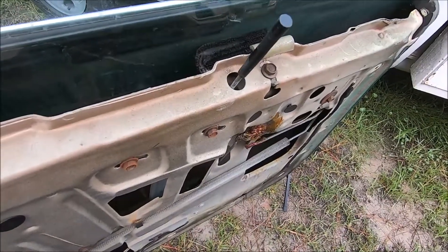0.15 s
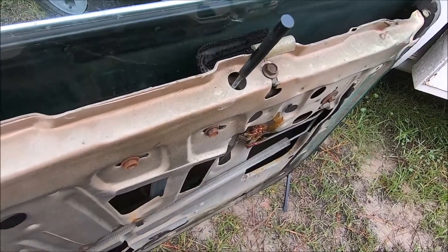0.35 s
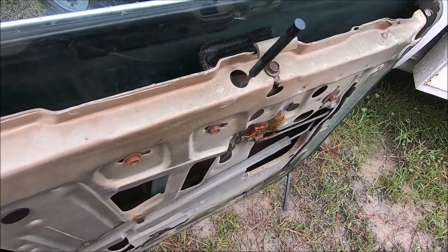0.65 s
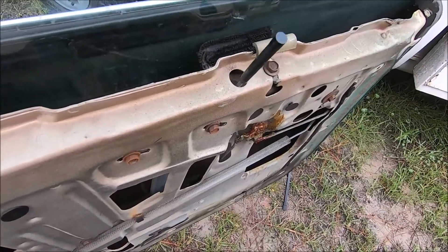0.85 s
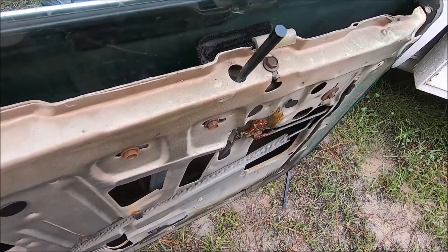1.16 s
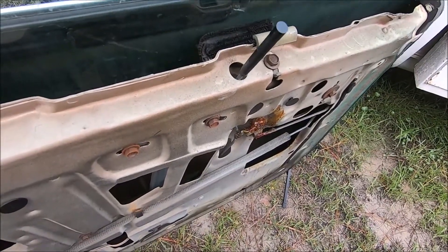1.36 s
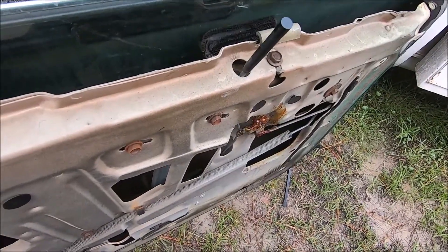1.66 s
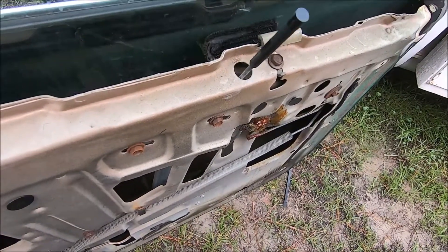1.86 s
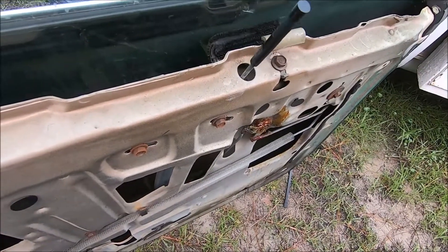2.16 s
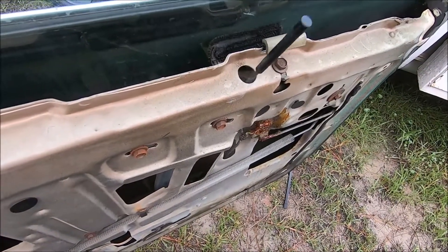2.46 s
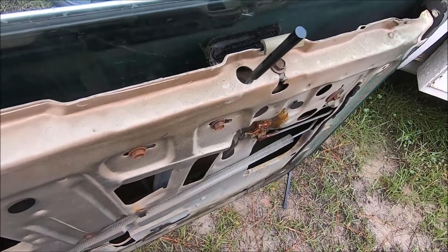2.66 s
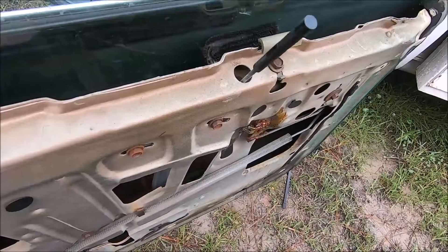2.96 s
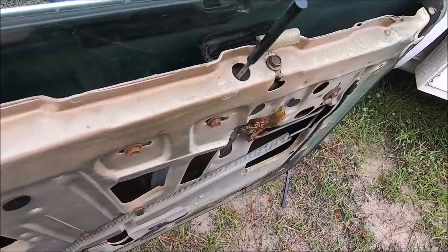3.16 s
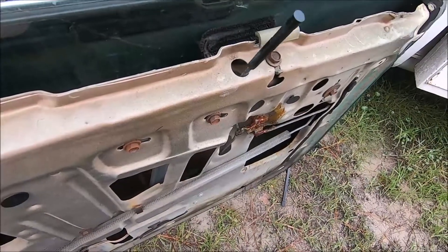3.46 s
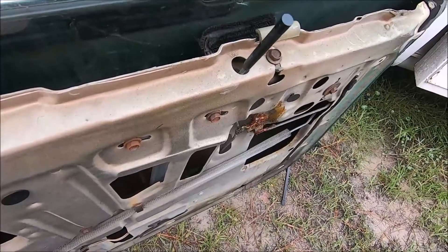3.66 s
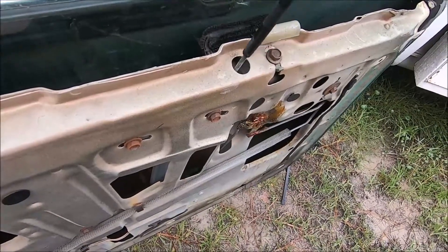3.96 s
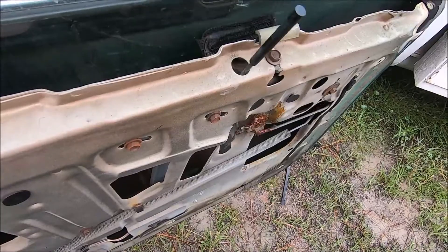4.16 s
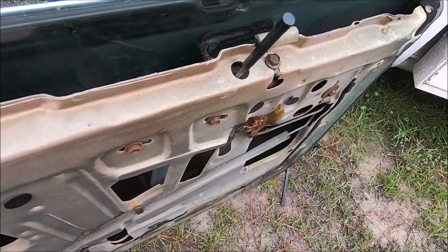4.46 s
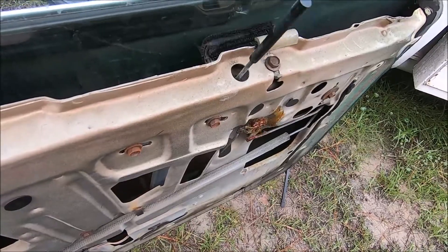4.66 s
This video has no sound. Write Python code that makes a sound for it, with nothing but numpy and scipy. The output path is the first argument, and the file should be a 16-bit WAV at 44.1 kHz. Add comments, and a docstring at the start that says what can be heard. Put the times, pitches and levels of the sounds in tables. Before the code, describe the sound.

Close to a stripped car door in quiet outdoor air, the tail of an earlier clunk fades. A switch clicks, then the lock motor whirrs briefly and throws the latch with a booming metallic clunk and rattle. After a pause with a plastic clack and dry tick, seven more clunks follow in a quickening run, locking and unlocking alternately, each settling with soft bounces.

```python
"""Over still outdoor air and a throbbing hum, the end of an earlier stroke fades in a stripped car door.
A rocker switch clicks, then a power lock makes eight strokes, locking and unlocking in turn, with a click
before each locking one. Gear teeth whirr, the linkage takes up its slack, throws the latch and hits its stop.
The sheet metal booms, the latch pings or a small spring sings, the rod rattles and the linkage settles.
A plastic clack, a dry tick and a scuff fall after the first stroke. Bodies are decaying noise and sine modes."""
import sys
import numpy as np
from scipy import signal
from scipy.io import wavfile

SR = 44100
rng = np.random.default_rng(int(sys.argv[2]) if len(sys.argv) > 2 else 0)


def persist_wave(psi):
    """Save psi, clipped to +-1, as 16-bit WAV."""
    counts = np.round(np.clip(psi, -1, 1) * 32767).astype(np.int16)
    wavfile.write(sys.argv[1], SR, np.atleast_2d(counts).T)


N = 212120
RING_SIZE = 3 * SR // 4   # samples kept of every ring


def from_db(db):
    """Decibels to gain."""
    return 10 ** (np.asarray(db) / 20)


def rms(x):
    """Root mean square."""
    return np.sqrt(np.mean(x ** 2) + 1e-20)


def unit(sound):
    """Scale a stereo ring so that its first 25 ms have rms 1."""
    return sound / rms(sound[:, :SR // 40])


def at_hz(points, hz):
    """Read a table on a log-frequency axis."""
    table = np.array(points)
    return np.interp(np.log(hz), np.log(table[:, 0]), table[:, 1])


def band(x, edges_hz, kind, order=2):
    """Butterworth filter."""
    return signal.sosfilt(signal.butter(order, edges_hz, kind, fs=SR, output="sos"), x)


def add(out, s, sound):
    """Mix a sound in at a time."""
    start = int(np.clip(round(s * SR), 0, N - 1))
    out[..., start:start + sound.shape[-1]] += sound[..., :N - start]


# stereo width of all noise: pitch_hz, side_minus_mid_db
WIDTH = [(60, -19), (270, -19), (500, -9), (1000, -3.5), (2000, -1), (4000, -3), (12000, -1)]
# its left-right balance: pitch_hz, left_minus_right_db
BALANCE = [(60, 1.5), (270, -0.5), (500, 5.5), (1000, 1.3), (2000, 2), (4000, -0.3), (12000, -1)]


def noise_bands(spectrum, size):
    """Split stereo noise into narrow bands, as (centre Hz, sound of rms 1, gain of each channel)."""
    edges = np.geomspace(22, 17000, 30)
    white = rng.standard_normal((2, 2, size + SR // 4))   # the extra quarter second lets the filters settle
    for k, (low, high) in enumerate(zip(edges, edges[1:])):
        hz = np.sqrt(low * high)
        mid, side = band(white[k % 2], [low, high], "band")[:, -size:]
        pair = mid + from_db(at_hz(WIDTH, hz)) * side * np.array([[1], [-1]])
        pan = from_db(at_hz(BALANCE, hz) * np.array([[.5], [-.5]]))
        yield hz, pair / rms(pair), pan * from_db(at_hz(spectrum, hz)) * np.sqrt(high - low)


# relative colour of still outdoor air: pitch_hz, density_db_per_hz
AIR_COLOUR = [(25, -9), (50, 2), (80, 6), (125, -8), (250, -9), (400, -18.5), (630, -29.5), (1000, -31),
              (2000, -39), (4000, -52.5), (7000, -53), (10000, -48.5), (15000, -63)]
# steady hum tones: pitch_hz, level_db_rms
HUM = [(59.3, -45.5), (68, -62)]
AIR_DB = -45.5   # rms


def outdoors():
    """Quiet air is coloured noise; the low hum throbs because its two tones beat."""
    air = sum(noise * gain for _, noise, gain in noise_bands(AIR_COLOUR, N))
    t = np.arange(N) / SR
    hum = sum(from_db(db) * np.sqrt(2) * np.sin(2 * np.pi * hz * t) for hz, db in HUM)
    return from_db(AIR_DB) * air / rms(air) + hum


def dense_modes(spectrum, t60s, build_cycles):
    """Response of countless close modes to one touch, as decaying noise; the lows build up later."""
    t, out = np.arange(RING_SIZE) / SR, 0
    for hz, noise, gain in noise_bands(spectrum, RING_SIZE):
        decay = np.exp(-np.log(1000) * t / at_hz(t60s, hz))
        shape = decay * (1 - np.exp(-t * hz / build_cycles))
        ring = noise * shape
        out = out + ring * (gain * rms(shape) / rms(ring))
    return out


def resonate(x, resonances):
    """Lift the broad resonances of a body."""
    for hz, width, db in resonances:
        x = x + (from_db(db) - 1) * signal.lfilter(*signal.iirpeak(hz, hz / width, fs=SR), x)
    return x


def registers(response):
    """Split a response into thump, clank and tick, each starting at rms 1."""
    thump_top_hz, tick_bottom_hz = 592, 3300
    thump = band(response, thump_top_hz, "low", order=4)
    clank = band(response, [thump_top_hz, tick_bottom_hz], "band", order=4)
    tick = band(response, tick_bottom_hz, "high", order=4)
    return [unit(thump), unit(clank), unit(tick)]


def contact_points(spectrum, resonances, t60s, build_cycles, count):
    """One response for each place where a body is touched: (place, register, channel, time)."""
    places = []
    for _ in range(count):
        response = dense_modes(spectrum, t60s, build_cycles)
        places.append(registers(resonate(response, resonances)))
    return np.array(places)


def touch(places):
    """Each contact lands somewhere else and so wakes its own blend of modes."""
    blend = rng.standard_normal(len(places))
    return np.tensordot(blend / np.linalg.norm(blend), places, 1)


# relative colour of the door's dense modes: pitch_hz, density_db_per_hz
DOOR_COLOUR = [(30, -15.5), (45, 0.5), (70, 3.5), (130, 0), (270, 1), (450, -7), (700, -18), (1700, -16.5),
               (2600, -24), (4200, -21.5), (6200, -27), (7500, -27.5), (10000, -28), (15000, -55)]
# their ring time: pitch_hz, t60_s
DOOR_T60 = [(40, 0.78), (130, 0.51), (300, 0.32), (600, 0.29), (1300, 0.17), (2600, 0.081), (5000, 0.086),
            (9000, 0.043), (15000, 0.14)]
# broad resonances of the door cavity and rod: centre_hz, width_hz, lift_db
DOOR_RESONANCES = [(261.6, 51, 6), (1003, 100, 4), (1370, 120, 3), (1795, 120, 7), (2245, 110, 6),
                   (2860, 260, 3), (3860, 120, 4), (6200, 400, 6.5)]


def door_body():
    """The sheet-metal door, ringing from five contact points."""
    return contact_points(DOOR_COLOUR, DOOR_RESONANCES, DOOR_T60, build_cycles=0.41, count=5)


def ringing(modes):
    """Responses of a few clear modes to one touch, one row each, with alternating sign."""
    t = np.arange(RING_SIZE) / SR
    rows = []
    for k, (hz, db, t60) in enumerate(modes):
        rows.append((-1) ** k * from_db(db - 60 * t / t60) * np.sin(2 * np.pi * hz * t))
    return np.array(rows)


def skin(rings, spread_db):
    """The outer panel's clear modes, with new strengths at every blow, slightly to the left."""
    strengths = from_db(spread_db * rng.standard_normal(len(rings)))
    return strengths @ rings * from_db([[.6], [-.6]])


def chatter(decay_s, per_s, spread_db, close_s):
    """A first contact, then random uneven ones that swell and die away, with unit energy."""
    t = np.arange(SR // 3) / SR
    hits = (rng.random(len(t)) < per_s / SR) * rng.choice([-1, 1], len(t))
    contacts = hits * from_db(spread_db * rng.standard_normal(len(t)))
    force = contacts * np.exp(-t / max(decay_s, 1e-4)) * (1 - np.exp(-t / close_s))
    force[0] = .3
    return force / np.linalg.norm(force)


def drive(response, force):
    """Play a force through a stereo response."""
    return signal.fftconvolve(response, force[None], axes=1)[:, :response.shape[1]]


# clear modes of the outer door panel: pitch_hz, level_db, t60_s
SKIN_MODES = [(65.9, -9.5, 0.49), (103.3, -11.5, 0.3), (136.2, -12.5, 0.65), (161.5, -10.5, 0.25),
              (220.4, -11, 0.48), (247, -13, 0.19), (261.7, -4.5, 0.25), (273.5, -0.5, 0.25),
              (293, -4.5, 0.21), (340, -21, 0.33), (449, -7, 0.31), (500.5, -12.5, 0.19),
              (551, -16.5, 0.35), (566, -16.5, 0.26), (671, -22, 0.19), (784, -27, 0.78),
              (959, -21.5, 0.47), (1031, -20.5, .35)]


def blows(rows, places, skin_db, contacts_per_s, close_s):
    """The bass feels each blow as one push; higher up it breaks into a burst of small contacts."""
    out, rings = np.zeros((2, N)), ringing(SKIN_MODES)
    for s, clank_db, thump_db, tick_db, chatter_s in rows:
        thump, clank, tick = touch(places)
        force = chatter(chatter_s, contacts_per_s, spread_db=3.0, close_s=close_s)[:SR // 10]
        boom = thump + from_db(skin_db) * skin(rings, spread_db=3.5)
        add(out, s, from_db(thump_db) * unit(boom))
        add(out, s, from_db(clank_db) * unit(drive(clank[:, :SR // 2], force)))
        add(out, s, from_db(tick_db) * unit(drive(tick[:, :SR // 4], force)))
    return out


def repeated(events, pattern):
    """The same short run of blows at every event (start_s, level_db)."""
    return [(s + delay, clank + db, thump + db, tick + db, chatter_s)
            for s, db in events for delay, clank, thump, tick, chatter_s in pattern]


def struck(rows, modes):
    """A small part rings with the same modes at every touch (start_s, level_db)."""
    out, ring = np.zeros(N), ringing(modes).sum(axis=0)
    for s, db in rows:
        add(out, s, from_db(db) * ring)
    return out


def soft_blows(rows, door):
    """Gentle blows on the door, with less of the panel's clear modes and a slower swell of contacts."""
    return blows(rows, door, skin_db=0.5, contacts_per_s=900, close_s=0.0016)


# fading end of an earlier stroke: start_s, clank_db, thump_db, tick_db, chatter_s
STROKE_TAIL = [(.001, -39, -31.5, -52, 0.0075)]


def stroke_tail(door):
    """An earlier stroke fades as the door's modes ring down."""
    return soft_blows(STROKE_TAIL, door)


# clear modes of the small spring: pitch_hz, level_db, t60_s
SPRING_MODES = [(5593, 0, .36), (5583, -10, .3), (5552, -15, .25)]


def spring():
    """Unlocking and its second settling bounce pluck it; it sings faintly in the stroke tail and at clicks."""
    second_bounce_s = UNLOCK_BOUNCES[1][0]
    faint_db = -54.5
    stops = [(stop, db) for stop, *_, db in UNLOCKS]
    again = [(s + second_bounce_s, db) for (s, *_), (_, db) in zip(UNLOCK_SETTLES, stops)]
    faint = [(s, faint_db) for s, *_ in CLICKS + STROKE_TAIL]
    return struck(stops + again + faint, SPRING_MODES)


# relative colour of the rocker's dense modes: pitch_hz, density_db_per_hz
ROCKER_COLOUR = [(60, -4.5), (210, -0.5), (400, -7), (700, -8.5), (1200, -3), (1800, -2), (2600, -7),
                 (4000, -10), (6500, -20), (10000, -26.5), (15000, -42)]
# their ring time: pitch_hz, t60_s
ROCKER_T60 = [(60, 0.34), (220, 0.58), (500, 0.32), (1200, 0.25), (3000, 0.057), (7000, 0.081),
              (15000, 0.045)]
# broad resonances of the switch plate: centre_hz, width_hz, lift_db
ROCKER_RESONANCES = [(455, 90, 8), (1100, 270, 8), (2012, 43, 8), (2300, 75, 3), (3170, 200, 3),
                     (3830, 150, 1.5), (4250, 150, 4.5)]
# rocker switch clicks: start_s, level_db
CLICKS = [(.121, 0.5), (2.299, 0), (3.323, -3), (4.119, -2)]
# the rocker slides, then snaps over: delay_s, clank_db, thump_db, tick_db, chatter_s
ROCKER_SNAP = [(-.014, -47.5, -46, -70, 0.03), (0, -31.5, -38, -35, 0.0067)]
# light taps on the rocker: start_s, clank_db, thump_db, tick_db, chatter_s
ROCKER_TAPS = [(.169, -59, -43.5, -43, 0.0016), (.362, -44.5, -48.5, -52, 0.004),
               (.984, -39, -36.5, -48, 0.0021)]
# the rocker springs back: start_s, level_db
RELEASES = [(.363, -30)]
# clear modes of its housing: pitch_hz, level_db, t60_s
HOUSING_MODES = [(215.3, -1, 0.69), (1172, -2.5, 0.13), (1465, -1, 0.053), (1730, -11, 0.12),
                 (9040, -15.5, 0.048), (12200, -30, .06)]


def switch():
    """The rocker slides, snaps and is tapped on its plate; its housing rings as it springs back."""
    rocker = contact_points(ROCKER_COLOUR, ROCKER_RESONANCES, ROCKER_T60, build_cycles=1.5, count=3)
    rows = repeated(CLICKS, ROCKER_SNAP) + ROCKER_TAPS
    clicks = blows(rows, rocker, skin_db=-10, contacts_per_s=1200, close_s=.0015)
    return clicks + struck(RELEASES, HOUSING_MODES)


# soft knock in the door after each click: delay_s, clank_db, thump_db, tick_db, chatter_s
AFTER_KNOCK = [(0.094, -44, -41, -71.5, 0.005)]


def after_knocks(door):
    """The door knocks softly after each click."""
    return soft_blows(repeated(CLICKS, AFTER_KNOCK), door)


# locking strokes: stop_s, travel_s, level_db, extra_thump_db, rattle_db, rattle_decay_s, latch_ping_db
LOCKS = [(.72, .042, .5, -0.5, -23.5, 0.062, -33), (2.595, .044, .5, -0.5, -22, 0.05, -21),
         (3.495, .037, 0, -2, -22, .04, -22), (4.2775, .04, 0, -2.5, -24, 0.055, -14)]
# unlocking strokes: stop_s, travel_s, level_db, extra_thump_db, rattle_db, rattle_decay_s, spring_db
UNLOCKS = [(1.981, .043, 1, 1, -42.5, 0.14, -46.5), (3.063, .04, -0.5, -.5, -37.5, 0.078, -53.5),
           (3.878, 0.038, 0.16, -1.5, -26, 0.047, -57.5), (4.63, .042, -1.34, 0.5, -40.5, 0.051, -54)]
# motor run ahead of the first blow of a stroke: lead_s, length_s, level_db
LOCK_RUN = (.021, .075, -32.5)
UNLOCK_RUN = (.015, 0.053, -32)


def motor_runs(strokes, run):
    """One run of the motor for each stroke: (start_s, length_s, level_db)."""
    lead, length, run_db = run
    return [(stop - travel - lead, length, run_db + db) for stop, travel, db, *_ in strokes]


def motor(door):
    """Gear teeth mesh faster and harder, with uneven force, as the motor spins up for a brief run."""
    top_tooth_hz, spin_up_s, rough, tick_db = 2277, .007, 2.2, -6.5
    out = np.zeros((2, N))
    for s, length, db in motor_runs(LOCKS, LOCK_RUN) + motor_runs(UNLOCKS, UNLOCK_RUN):
        _, clank, tick = touch(door)
        t = np.arange(int(length * SR)) / SR
        speed = 1 - np.exp(-t / spin_up_s)
        meshes = np.diff(np.floor(np.cumsum(top_tooth_hz * speed) / SR), prepend=0)
        teeth = meshes * speed * (1 + rough * rng.standard_normal(len(speed)))
        sound = drive(clank + from_db(tick_db) * tick, teeth)
        add(out, s, from_db(db) * sound / rms(sound[:, :len(speed)]))
    return out


# slack, latch and stop: share_of_travel_to_go, clank_db, thump_db, tick_db, chatter_s
LOCK_BLOWS = [(1, -25, -20.5, -36, .0042), (.76, -22, -18.5, -25.5, 0.0039),
              (0.0021, -23, -15.5, -28, .0034)]
UNLOCK_BLOWS = [(1, -29, -34.5, -34, .012), (.57, -29, -20, -46.5, 0.0036),
                (0, -21.5, -19.5, -26.5, 0.0059)]


def stroke_blows(strokes, pattern):
    """The three blows of each stroke, spread over its travel."""
    return [(stop - to_go * travel, clank + db, thump + db + extra_db, tick + db, chatter_s)
            for stop, travel, db, extra_db, *_ in strokes
            for to_go, clank, thump, tick, chatter_s in pattern]


def lock_strokes(door):
    """The linkage takes up its slack, throws the latch and hits its stop, shaking the door."""
    rows = stroke_blows(LOCKS, LOCK_BLOWS) + stroke_blows(UNLOCKS, UNLOCK_BLOWS)
    return blows(rows, door, skin_db=2.0, contacts_per_s=1100, close_s=0.0012)


# clear modes of the latch: pitch_hz, level_db, t60_s
LATCH_MODES = [(5860, 5, 0.017), (6370, -1, .06), (6560, -0.5, 0.017), (8800, -14.5, 0.066)]


def latch_pings():
    """The latch pings at the end stop of each locking stroke."""
    return struck([(stop, db) for stop, *_, db in LOCKS], LATCH_MODES)


def rod(door):
    """The loose rod buzzes just after each end stop; its treble fades faster, so the rattle dulls."""
    delay_s, soften_s = .015, .14
    thump_db, tick_db = 3.5, -9   # against the clank
    out = np.zeros((2, N))
    for stop, *_, db, decay_s, _ in LOCKS + UNLOCKS:
        thump, clank, tick = touch(door)
        force = chatter(decay_s, per_s=300, spread_db=2.5, close_s=0.001)
        hard = force * np.exp(-np.arange(len(force)) / SR / soften_s)
        body = drive(clank + from_db(thump_db) * thump, force)
        sound = body + from_db(tick_db) * drive(tick, hard)
        add(out, stop + delay_s, from_db(db) * sound / rms(sound[:, :SR // 20]))
    return out


# the linkage settles back: start_s, level_db, extra_loss_per_bounce_db
LOCK_SETTLES = [(.849, 0, 3.5), (2.711, -3.5, -2), (3.621, 1, 13), (4.384, 0, 2.5)]
UNLOCK_SETTLES = [(2.116, 2.5, 0.62), (3.148, -2, 0.8), (3.932, -3, 2.7), (4.708, -1, 0)]
# its three bounces: delay_s, clank_db, thump_db, tick_db, chatter_s
LOCK_BOUNCES = [(0, -36, -37.5, -50, 0.0088), (.036, -38, -34.5, -53, 0.011), (0.089, -47, -42, -66, .004)]
UNLOCK_BOUNCES = [(0, -37, -31, -56, 0.011), (.024, -38.5, -33, -47, 0.0057), (.078, -48, -38, -62.5, .009)]


def bounces(settles, pattern):
    """Each settling is the same few bounces, dying faster when more is lost on each."""
    rows = []
    for s, db, loss_db in settles:
        for k, bounce in enumerate(pattern):
            rows += repeated([(s, db - k * loss_db)], [bounce])
    return rows


def settling(door):
    """The linkage settles back after each stroke in three soft bounces."""
    rows = bounces(LOCK_SETTLES, LOCK_BOUNCES) + bounces(UNLOCK_SETTLES, UNLOCK_BOUNCES)
    return soft_blows(rows, door)


# plastic clacks: start_s, level_db
CLACKS = [(.985, -31)]
# clear modes of the plastic part: pitch_hz, level_db, t60_s
CLACK_MODES = [(1550, -2.5, 0.1), (1670, 3, 0.062), (1830, -8, 0.076), (2250, -18, 0.066),
               (2650, -11, 0.065)]


def clack():
    """A plastic part clacks with a few short modes."""
    return struck(CLACKS, CLACK_MODES)


# a dry tick, then a faint scuff: start_s, clank_db, thump_db, tick_db, chatter_s
DRY_TICKS = [(1.191, -45.5, -38, -48, 0.0028), (1.312, -73, -63, -64.5, 0.027)]
# relative colour of the dry part: pitch_hz, density_db_per_hz
DRY_COLOUR = [(60, -16), (250, 3), (700, -5), (1600, -4), (4000, -16.5), (10000, -13), (15000, -24)]
# its ring time: pitch_hz, t60_s
DRY_T60 = [(100, 0.14), (1000, 0.069), (5000, 0.077), (15000, 0.088)]


def dry_ticks():
    """A short-ringing part nearby ticks once, then scuffs in a longer run of contacts."""
    part = contact_points(DRY_COLOUR, [], DRY_T60, build_cycles=0.67, count=1)
    return blows(DRY_TICKS, part, skin_db=-24.5, contacts_per_s=1300, close_s=0.0012)


def scene():
    """The lock sounds through the door; the switch and small ticks have bodies of their own."""
    door = door_body()
    before = outdoors() + stroke_tail(door) + spring() + switch() + after_knocks(door)
    strokes = motor(door) + lock_strokes(door) + latch_pings() + rod(door) + settling(door)
    return before + strokes + clack() + dry_ticks()


def record(dry):
    """The highest peaks are rounded and the top is cut."""
    top_cut = signal.cheby2(16, 70, 16200, fs=SR, output="sos")   # order, stop-band dB, stop-band edge Hz
    return signal.sosfilt(top_cut, np.tanh(dry))


dry = scene()
out = record(dry)
persist_wave(out)
```